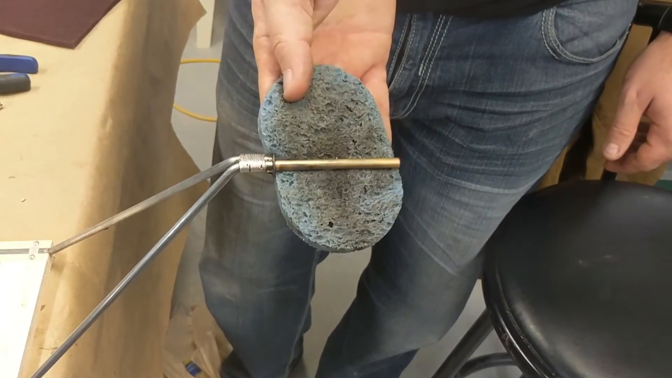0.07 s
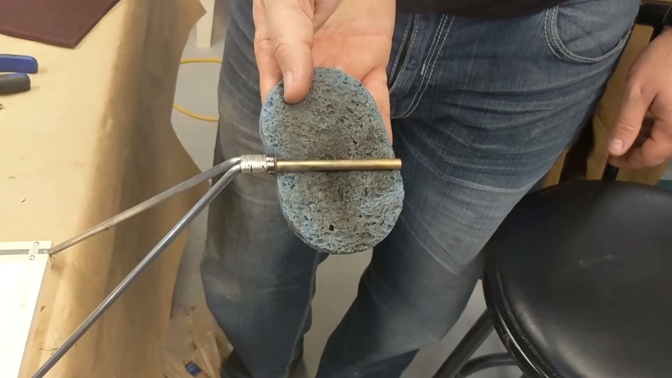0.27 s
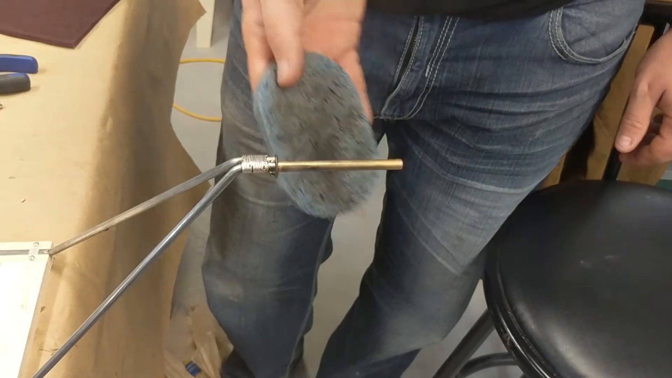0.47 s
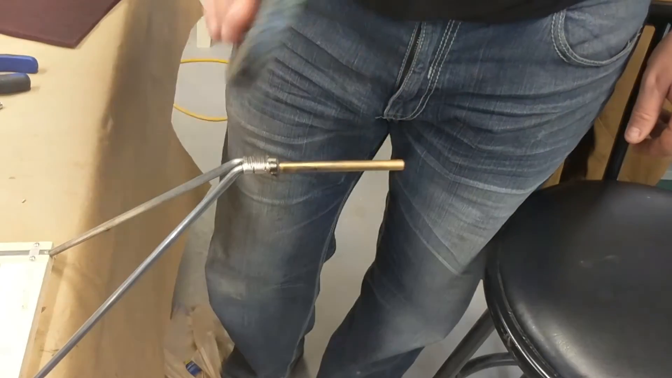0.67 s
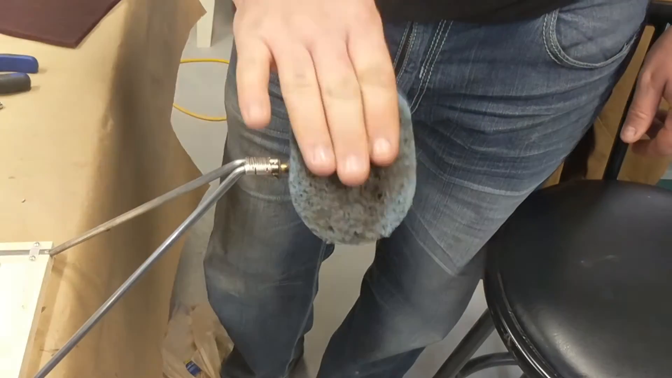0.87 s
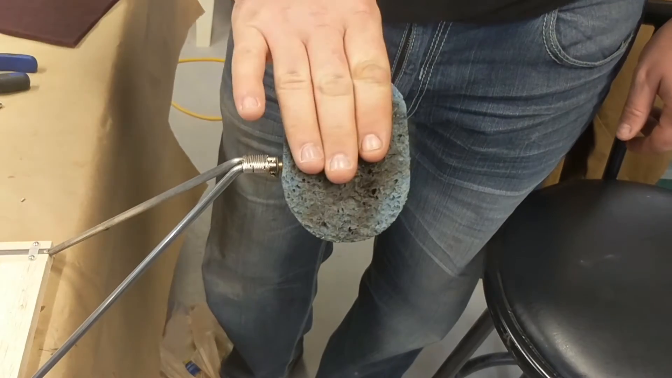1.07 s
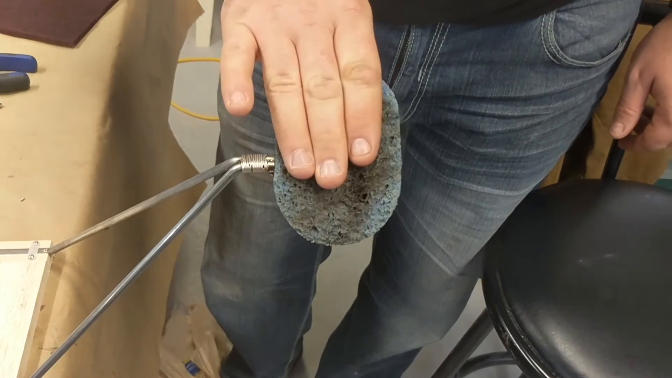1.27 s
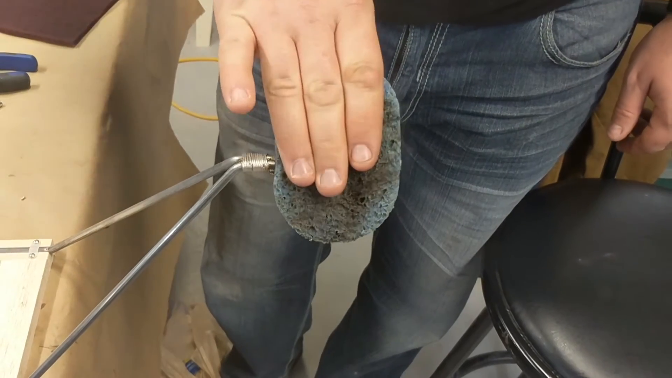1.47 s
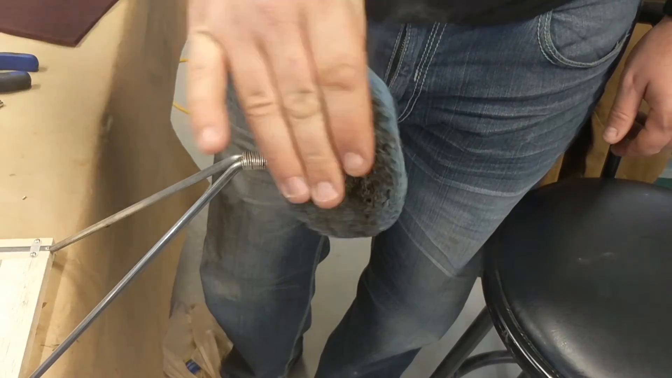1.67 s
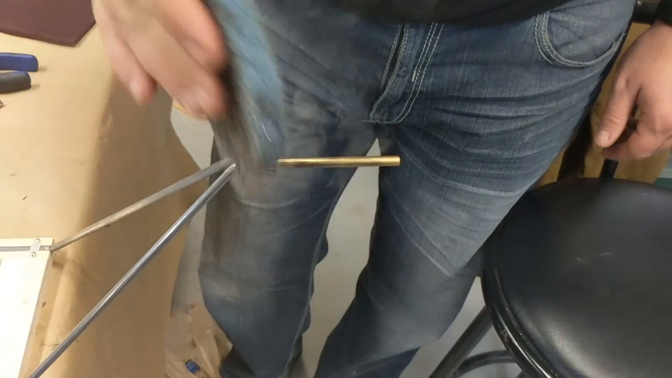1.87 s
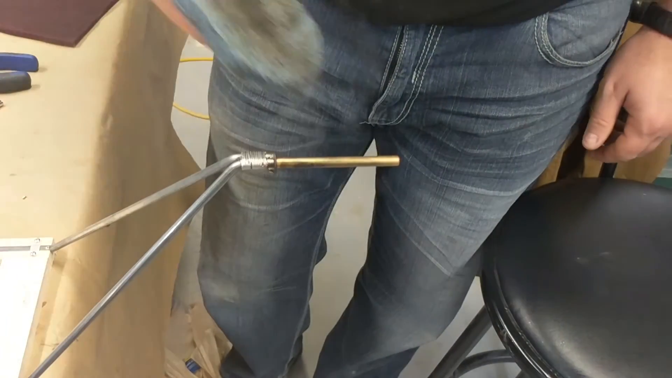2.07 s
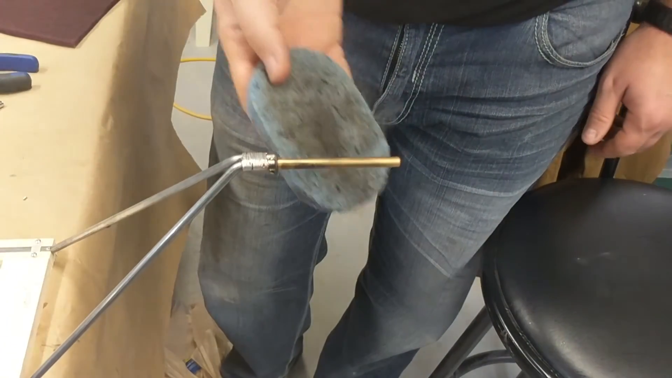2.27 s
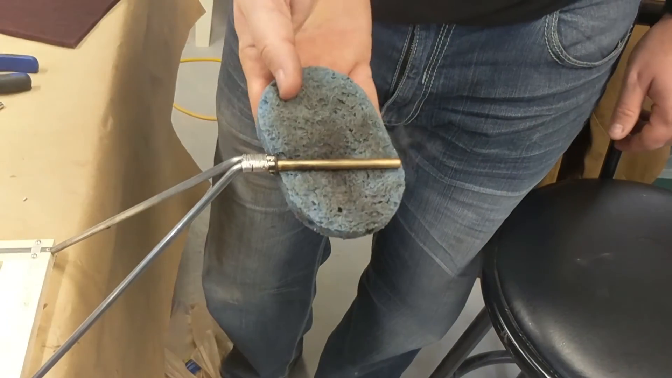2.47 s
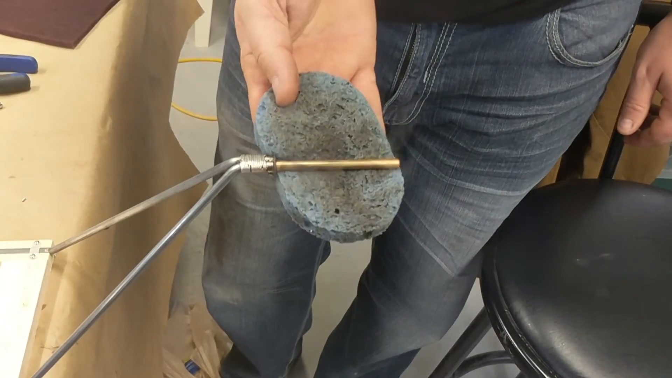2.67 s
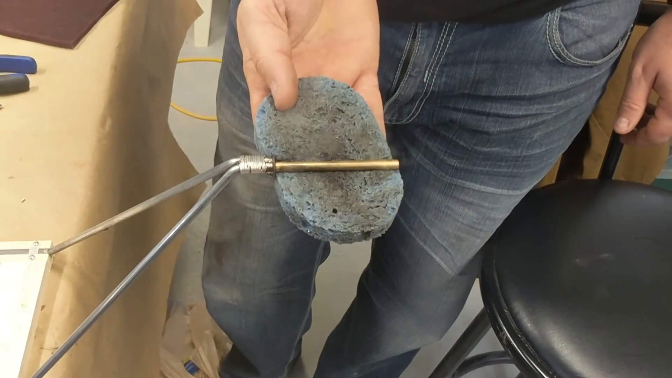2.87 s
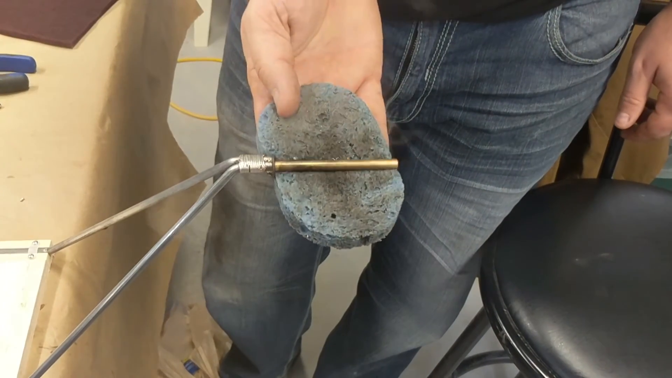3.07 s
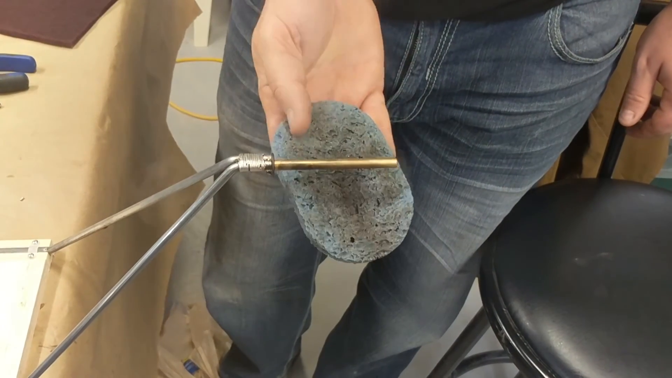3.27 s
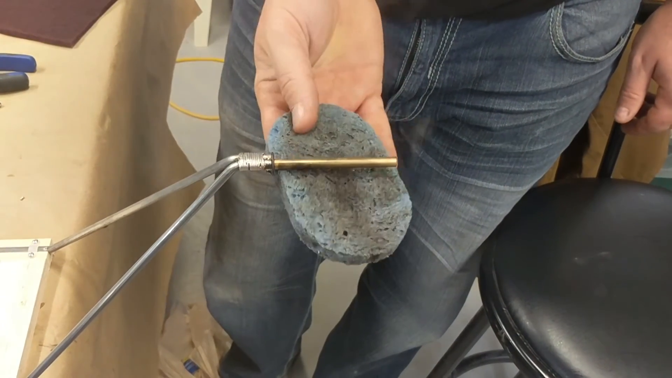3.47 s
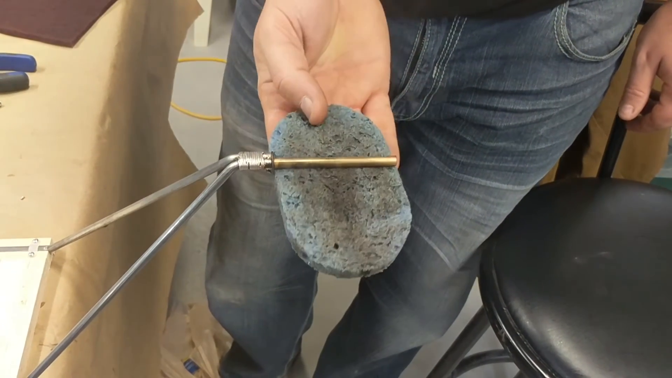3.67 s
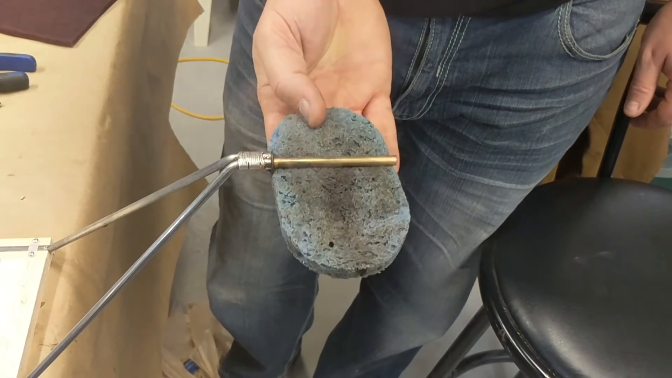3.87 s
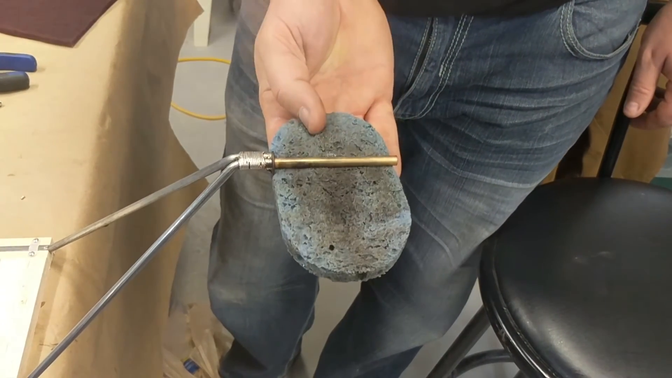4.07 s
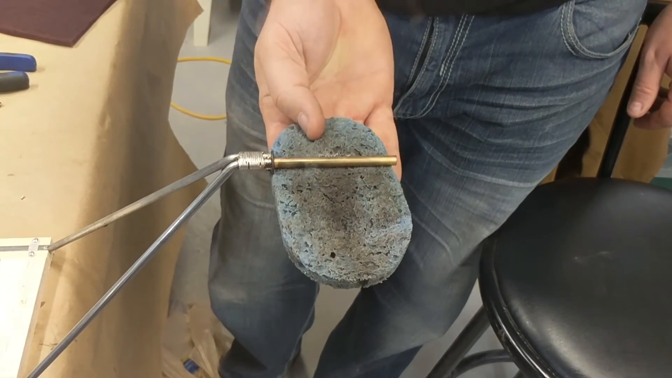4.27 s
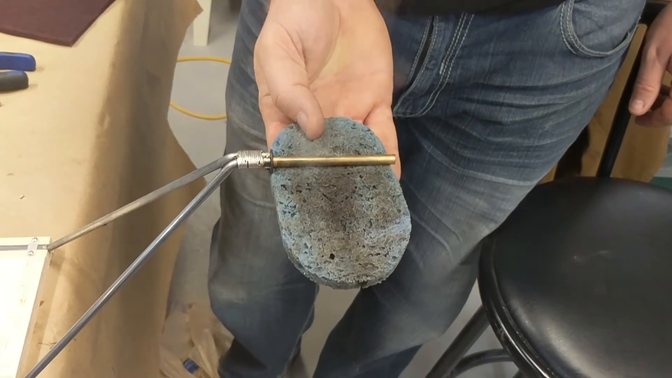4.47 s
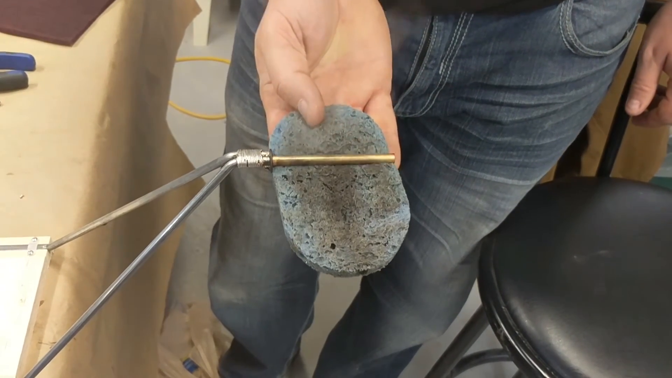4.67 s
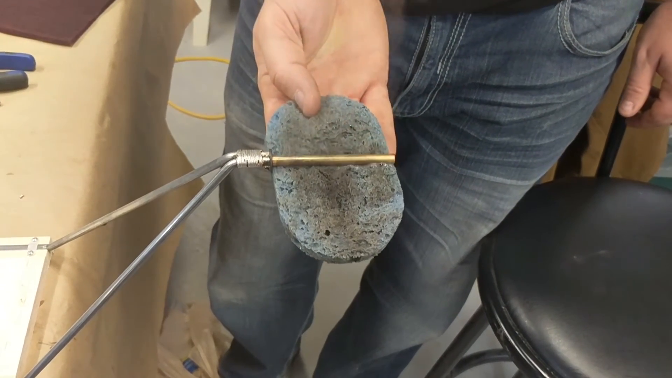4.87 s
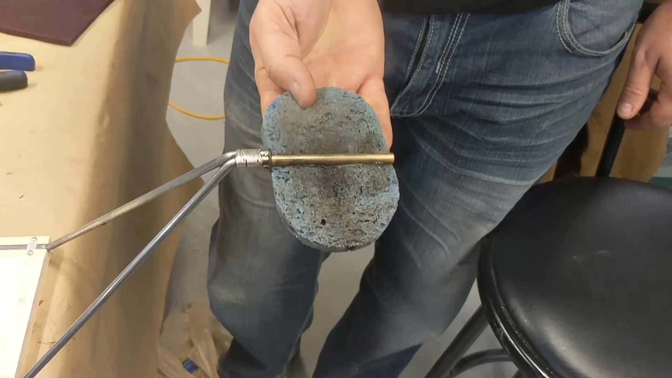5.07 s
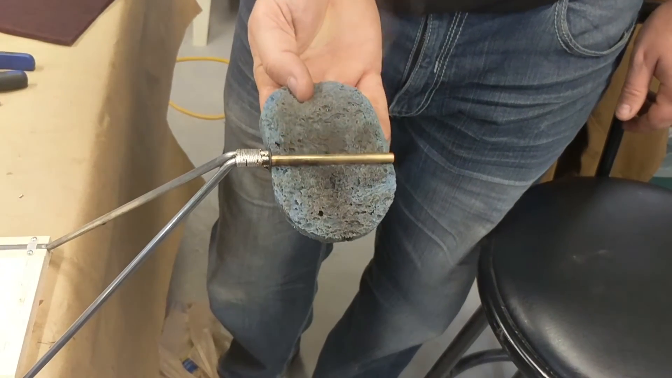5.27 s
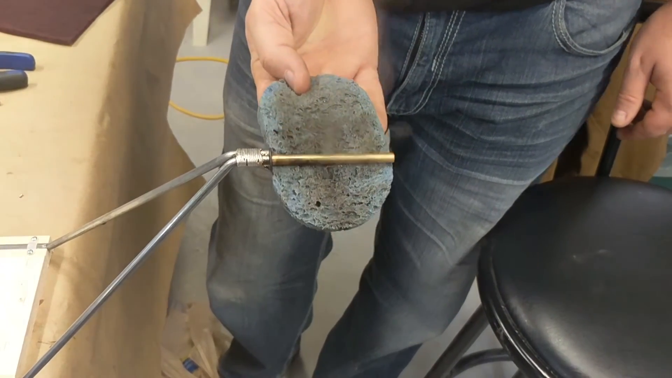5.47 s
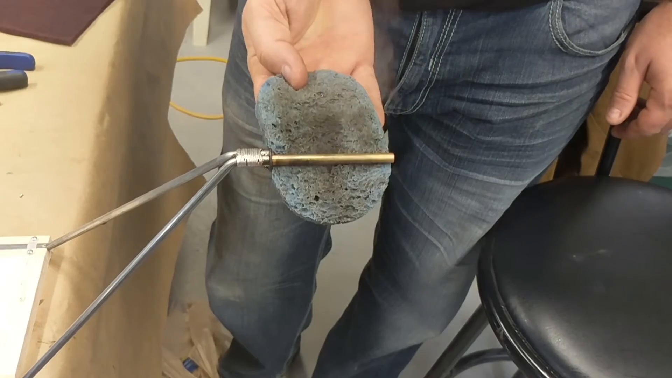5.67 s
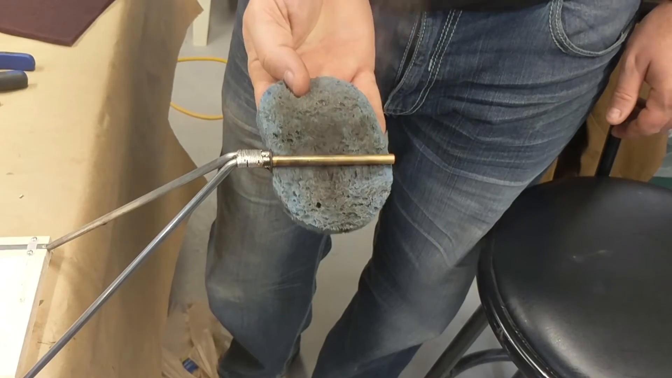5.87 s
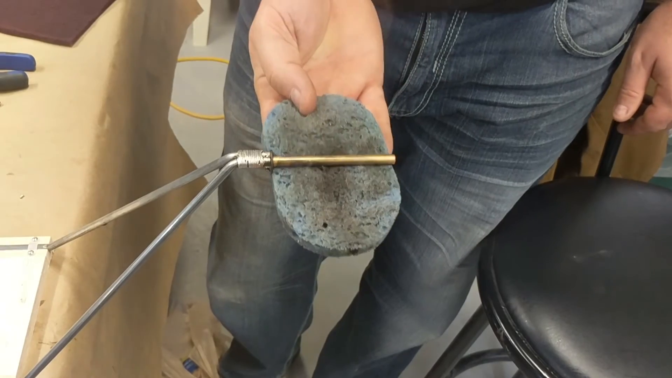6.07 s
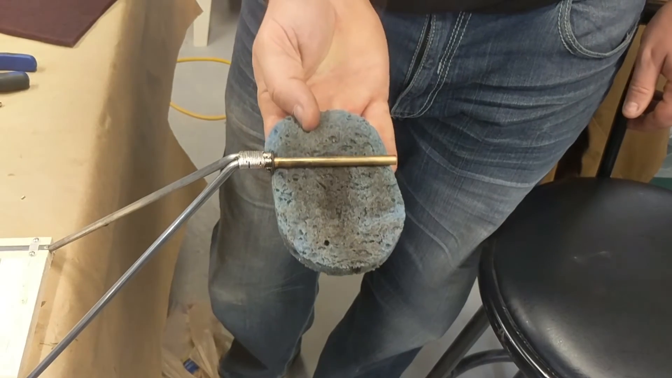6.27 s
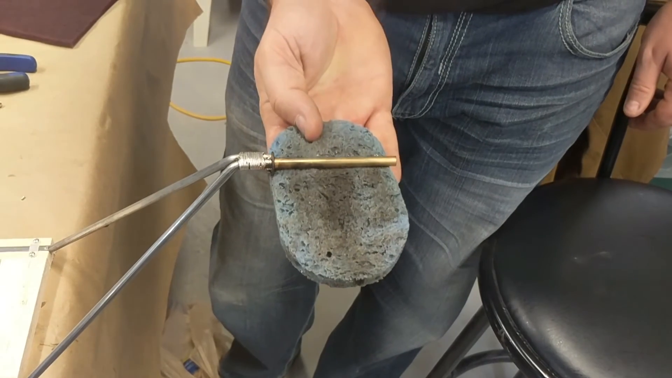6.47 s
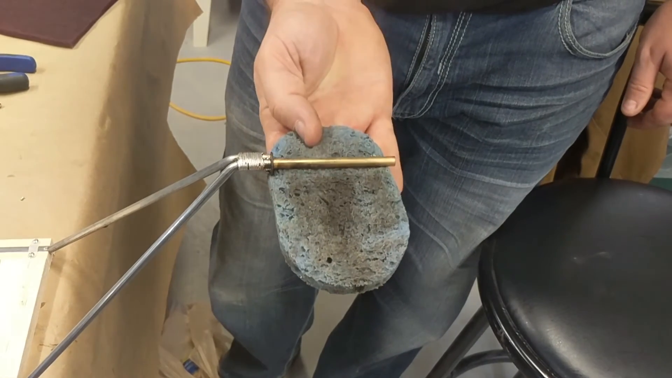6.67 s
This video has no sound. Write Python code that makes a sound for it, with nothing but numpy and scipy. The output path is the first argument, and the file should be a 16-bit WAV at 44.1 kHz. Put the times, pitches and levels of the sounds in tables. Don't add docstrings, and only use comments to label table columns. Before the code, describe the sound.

Bright, dense sizzling of water flashing to steam on hot brass, in several bursts, ending in one long steady hiss with sharp pops.

```python
import sys
import numpy as np
from scipy import signal
from scipy.fft import rfft, irfft
from scipy.io import wavfile
from scipy.ndimage import uniform_filter1d

SR = 44100
rng = np.random.default_rng(int(sys.argv[2]) if len(sys.argv) > 2 else 0)


def rack_gain(trim_db):
    fader = np.asarray(trim_db, float)
    return 10 ** (fader / 20)


def generate_wav(signal):
    frames = np.transpose(np.atleast_2d(signal))
    scaled = np.clip(frames, -1, 1) * 32767
    pcm = np.round(scaled).astype(np.int16)
    wavfile.write(sys.argv[1], SR, pcm)


N = 296969
EDGE_HZ = 15720


def unit_rms(x):
    return x / np.sqrt(np.mean(x ** 2) + 1e-20)


def read_spectrum(points, hz):
    point_hz, level_db = np.transpose(points)
    return np.interp(np.log(hz + 1), np.log(point_hz + 1), level_db)


def modal_lift(modes, hz):
    return sum(db / (1 + (2 * (hz - centre_hz) / width_hz) ** 2) for centre_hz, width_hz, db in modes)


def hump(hz, centre_hz, octaves):
    return np.exp(-.5 * (np.log2((hz + 1) / centre_hz) / octaves) ** 2)


def drift(per_s):
    hz = np.fft.rfftfreq(N, 1 / SR)
    return unit_rms(irfft(rfft(rng.standard_normal(N)) * hz * np.exp(-(hz / per_s) ** 2), N))


def passing_changes(t, events):
    return sum(db * np.exp(-((t - at) / length) ** 2) for at, length, db in events)


def add(mix, s, sound):
    part = mix[round(s * SR):][:len(sound)]
    part += sound[:len(part)]


# start_s, boiling_db, wetness_db
PRESS_TABLES = [
    [(0.0, -40.5, -10.5), (0.01, -43, -13.5), (0.226, -42, -14), (0.288, -46, -12), (0.326, -53, -7.5),
     (0.37, -92, 11)],
    [(0.9, -62, -6.5), (1.048, -48.5, -9.5), (1.226, -49.5, -8.5), (1.246, -43.5, -15), (1.5, -45, -10.5),
     (1.674, -51, -11), (1.69, -56, -8)],
    [(1.69, -56.5, -14), (1.79, -63.5, 0.5), (1.84, -60.5, -6), (1.864, -62, -5), (1.872, -60, -11),
     (1.906, -66.5, -1), (1.97, -70, -2)],
    [(2.39, -99, 2), (2.408, -50, -14), (2.434, -39, -18), (2.494, -39.5, -11.5), (3.144, -40.5, -13.5),
     (3.192, -44.5, -12), (3.23, -68, -8)],
    [(3.49, -81, -9), (3.51, -52, -19), (3.54, -46, -16.5), (3.64, -38, -14), (3.95, -39, -11.5),
     (5.82, -40, -8), (5.93, -44, -7), (6.03, -41, -8), (6.73, -40.5, -7)],
]
# start_s, length_s, boiling_db
EDGE_DABS = [
    (0.84, 0.011, -58),
    (0.878, 0.029, -49),
    (3.504, 0.0087, -49),
]
# centre_s, length_s, change_db
GRIP_SHIFTS = [
    (2.81, .06, -1.5),
    (3.89, 0.067, -2),
    (4.456, .1, -1.5),
    (4.64, .1, 0.9),
    (5.47, .08, -1),
    (6.055, .02, 1.5),
    (6.2, 0.027, 3),
    (6.24, .02, 0.5),
    (6.342, 0.061, 2),
    (6.47, .04, -1),
]


def boiling(t):
    boil_db = np.full(N, -110.)
    for rows in PRESS_TABLES:
        s, db, _ = np.transpose(rows)
        dying_s = s[-1] + .1
        boil_db = np.maximum(boil_db, np.interp(t, [*s, dying_s], [*db, -110], left=-110))
    for s, length, db in EDGE_DABS:
        edge = np.maximum((s - t) / .25, t - s) / length
        boil_db = np.maximum(boil_db, db - 4.5 * edge)
    s, _, wet_db = np.transpose(sum(map(list, PRESS_TABLES), []))
    shift_db = passing_changes(t, GRIP_SHIFTS)
    surge_db = .5 * drift(15.7)
    usual_wet_db = -10.5
    wetness_db = np.interp(t, s, wet_db) - usual_wet_db - 0.43 * shift_db
    return boil_db + shift_db + surge_db, wetness_db


def patchwork(shape, across_pitch):
    chance = rng.standard_normal(shape[::-1]).T
    across = uniform_filter1d(chance, size=across_pitch, axis=0)
    return unit_rms(uniform_filter1d(across, size=30, axis=1))


# frequency_hz, density_db_per_hz
FIZZ_SPECTRUM = [(240, -64), (400, -15.5), (488, -13), (727, -14), (1020, -7), (1300, -10.5), (2370, -4.5),
                 (3870, -8.5), (11700, -2.5), (14200, 1), (15600, 0.5)]
# frequency_hz, width_hz, lift_db
BENCH_MODES = [(1010, 47, -4.5), (1290, 30, -1), (1480, 68, 1), (1700, 69, 1), (2620, 80, 0.5),
               (3290, 32, 1), (3860, 53, 9.5)]
# time_s, depth_db
PORE_RINGING = [
    (.85, .5),
    (.95, 1.5),
    (1.6, 1.2),
    (1.72, 2.2),
    (1.98, 2.2),
    (2.3, .6),
]


def steam():
    t = np.arange(N) / SR
    boil_db, wet_db = boiling(t)
    spread_db = 3 + 0.045 * np.maximum(-41 - boil_db, 0)
    sizes = rack_gain(np.clip(spread_db, 0, 6) * np.minimum(rng.exponential(1, N), 5))
    bubbles_per_s = 9000
    bursts = sizes * rng.choice([-1., 1.], N) * (rng.random(N) < bubbles_per_s / SR)
    bursts = bursts / np.sqrt(uniform_filter1d(bursts ** 2, size=4410) + 1e-9)
    drive = rack_gain(-4.0) * bursts + rack_gain(-3.0) * rng.standard_normal(N)
    hz, frames, z = signal.stft(drive, SR, nperseg=512, noverlap=384)

    wet = np.interp(frames, t, wet_db)
    sputter = hump(hz, 2400, .55)[:, None] * wet
    body = hump(hz, 5500, .55)[:, None] * (2.13 + 0.47 * wet)
    gurgle = np.maximum(hump(hz, 1000, .4), hz < 1000)[:, None] * (-1 + 1.1 * wet)
    wetness = np.clip(sputter + body + gurgle, -25, 25)

    shape = (len(hz), len(frames))
    patches = patchwork(shape, 8)
    pores = patchwork(shape, 3) * np.interp(frames, *np.transpose(PORE_RINGING))
    flutter = unit_rms(uniform_filter1d(rng.standard_normal(len(frames)), size=3))
    plain = read_spectrum(FIZZ_SPECTRUM, hz) + modal_lift(BENCH_MODES, hz) - 60 * (hz > EDGE_HZ)
    colour = rack_gain(plain[:, None] + wetness + pores + 0.73 * patches + 0.42 * flutter)
    fizz = signal.istft(z * colour, SR, nperseg=512, noverlap=384)[1][:N]
    return rack_gain(boil_db + 6.5) * fizz


# frequency_hz, density_db_per_hz
AIR_SPECTRUM = [(15, -30), (25, -17), (66, -2.5), (129, 0), (314, -13), (400, -19.5), (633, -17),
                (724, -24.5), (923, -20), (1420, -43), (1670, -27), (3020, -30), (6950, -36), (9350, -37.5),
                (15600, -39.5)]
# frequency_hz, width_hz, lift_db
ROOM_MODES = [(58, 14, 8), (68, 12, 7), (90, 12, 5), (116, 10, 6), (135, 8, 5), (148, 9, 12), (160, 8, 5),
              (186, 10, 4), (210, 18, 5), (241, 12, 6), (305, 16, 8), (331, 8, 6), (499, 20, 4),
              (1220, 40, 3), (2100, 40, 3)]


def ventilation(fizz):
    back_s = 0.43
    keep = np.exp(-1 / (back_s * SR))
    loud = signal.lfilter([1 - keep], [1, -keep], abs(fizz))
    duck = rack_gain(-4.5 * loud / loud.max())
    hz = np.fft.rfftfreq(N, 1 / SR)
    colour = rack_gain(read_spectrum(AIR_SPECTRUM, hz) + modal_lift(ROOM_MODES, hz))
    air = rfft(rng.standard_normal(N)) * colour * (hz < EDGE_HZ + 150)
    thin = irfft(air * (hz > 400), N)
    whole = irfft(air, N)
    return rack_gain(-48.5) * (whole + (duck - 1) * thin) / whole.std()


def add_snap(mix, s, peak_db, hz):
    cycles = np.arange(64) / SR * hz * 1.15
    turn = rng.uniform(-0.12, 1.0)
    snap = np.sin(2 * np.pi * cycles + turn) * cycles * np.exp(-2.4 * cycles)
    snap = snap - snap.mean()
    snap = snap + .25 * np.roll(snap, shift=17)
    add(mix, s - .0001, rack_gain(peak_db) * snap / abs(snap).max())


# start_s, peak_db
LARGE_BUBBLES = [(.0054, -28), (.2586, -27), (.2834, -26), (.3168, -30), (2.4159, -30), (2.4362, -25),
                 (2.4465, -24), (2.5398, -22), (2.5862, -18), (2.594, -22), (2.636, -21), (2.6708, -19),
                 (2.731, -20), (2.8454, -21), (2.8712, -22), (2.896, -20), (2.9182, -22), (2.9843, -22),
                 (3.073, -23), (3.1223, -23), (3.1557, -23), (3.6768, -21), (3.7357, -20), (4.5475, -22),
                 (5.6347, -19), (5.741, -17), (5.751, -21), (6.4387, -18), (6.6702, -21)]


def bubble_pops(mix):
    for s, peak_db in LARGE_BUBBLES:
        add_snap(mix, s, peak_db, rng.uniform(10000, 12000))


# start_s,
# peak_db, pitch_hz
PITCHED_SNAPS = [(.3361, -33, 8150), (0.7088, -47, 1490), (.8365, -45, 9000), (0.875, -32, 8000),
                 (.878, -34, 7100), (0.8791, -31.5, 4760), (0.8854, -32, 7600), (1.679, -40, 3200),
                 (2.2868, -46, 7400), (2.4099, -35, 9000), (3.4386, -46, 3060), (3.435, -53, 2500),
                 (3.441, -55, 1500), (2.0005, -44, 6000)]


def pitched_snaps(mix):
    for s, peak_db, pitch_hz in PITCHED_SNAPS:
        add_snap(mix, s, peak_db, pitch_hz)


# start_s, film_db, rustle_db
OFF_ROD = [
    (.35, -71.5, -67.5),
    (2.0, -79, -69),
    (3.22, -75, -72),
]
# centre_s, length_s, rustle_db
HAND_SWINGS = [
    (0.564, .04, 3),
    (.71, 0.036, 2),
    (2.144, 0.04, 2.5),
    (2.31, 0.036, 0),
    (3.47, .05, 1),
]


def between_presses():
    s, film_db, rustle_db = np.transpose(OFF_ROD)
    t, hz = np.arange(N) / SR, np.fft.rfftfreq(N, 1 / SR)
    sizes = rack_gain(5.2 * np.minimum(rng.exponential(1, N), 4))
    ticks = sizes * np.clip(rng.standard_normal(N), -2, 2) * (rng.random(N) < .12)
    film = unit_rms(irfft(rfft(ticks) * hump(hz, 13000, 0.97) * (hz < EDGE_HZ + 150), N))
    rustle = unit_rms(irfft(rfft(rng.standard_normal(N)) * hump(hz, 1090, 0.68), N))
    gap = np.searchsorted(s[1:] - .2, t)
    since = np.clip(t - s[gap], 0, .5)
    film_level_db = film_db[gap] - 18 * since + .7 * drift(9)
    rustle_level_db = rustle_db[gap] + 9.5 * since + 1.2 * drift(9) + passing_changes(t, HAND_SWINGS)
    return film * rack_gain(film_level_db) + rustle * rack_gain(rustle_level_db)


# start_s, peak_db
LAST_DROPS = [(.4438, -51), (.4908, -52), (.522, -46), (.7615, -53), (.7732, -50), (1.9, -44),
              (1.9271, -48), (1.9733, -51), (2.0002, -41), (2.005, -52), (2.015, -50), (2.076, -54),
              (2.1, -51), (2.1753, -43), (2.1762, -48), (2.215, -51), (2.3346, -52), (3.2499, -47),
              (3.2588, -53), (3.293, -50), (3.3526, -49), (3.363, -50), (3.3779, -49), (3.4146, -53),
              (3.444, -43.5), (3.4783, -46.5), (3.497, -54)]


def spitting_drops(mix):
    for s, peak_db in LAST_DROPS:
        add_snap(mix, s, peak_db, rng.uniform(10500, 13000))


def resonate(x, hz, width_hz):
    turn = np.exp(2j * np.pi * np.cumsum(hz) / SR)
    r = np.exp(-np.pi * width_hz / SR)
    return 2 * (turn * signal.lfilter([1 - r], [1, -r], x / turn)).real


# start_s, length_s, pitch_hz, glide_hz, level_db
PORE_JETS = [
    (.87, 0.35, 5060, 60, -63),
    (0.88, .34, 5340, 330, -62.5),
    (.98, 0.24, 8350, 250, -59),
    (.98, 0.67, 2070, 38, -62),
    (1.2, .13, 1645, 5, -62),
    (1.12, 0.59, 1210, 15, -66),
    (1.04, .18, 3150, 50, -67),
    (1.1, 0.25, 8400, -50, -62),
    (1.74, .2, 5100, 10, -82),
]


def steam_jets(mix):
    for start, length, hz, glide, db in PORE_JETS:
        t = np.arange(0, length, 1 / SR)
        pitch = (hz + glide * t / length) * (1 + .014 * drift(17)[:len(t)])
        width_hz = min(450, .15 * hz)
        whistle = resonate(rng.standard_normal(len(t)), pitch, width_hz)
        whistle = resonate(whistle, pitch, width_hz)
        opening = np.clip(np.minimum(t / .04, (length - t) / .06), 0, 1)
        level_db = db - 12 * (1 - opening) + drift(23)[:len(t)] + 2
        add(mix, start, rack_gain(level_db) * unit_rms(whistle))


def scene():
    fizz = steam()
    mix = fizz + ventilation(fizz) + between_presses()
    bubble_pops(mix)
    pitched_snaps(mix)
    spitting_drops(mix)
    steam_jets(mix)
    return np.array([mix, mix])


# time_s, low_hz, high_hz, level_db
CHANNEL_SPLITS = [(.07, 5600, 7800, -59), (1.81, 5100, 7000, -71), (2.25, 4600, 5800, -86),
                  (3.9, 4100, 6400, -55), (3.9, 10300, 12600, -52), (3.9, 13000, 15500, -50),
                  (3.97, 7500, 9100, -55), (3.97, 12300, 14000, -52), (4.06, 8200, 9900, -54),
                  (4.94, 6800, 8400, -56), (6.22, 8200, 10500, -52), (6.22, 12300, 14700, -50),
                  (6.31, 4600, 5800, -58), (6.52, 5000, 6400, -58), (6.52, 14400, 15800, -55),
                  (6.61, 12300, 14000, -52)]


def channel_difference():
    side = np.zeros(N)
    hz = (np.arange(1024) + .5) * SR / 2048
    window = signal.windows.cosine(2048)
    for s, low_hz, high_hz, db in CHANNEL_SPLITS:
        start = round((s * SR - 143) / 1024 - 1) * 1024 + 143
        lines = np.flatnonzero((hz > low_hz) & (hz < high_hz))
        waves = window * np.cos(np.pi / 1024 * np.outer(lines + .5, np.arange(2048) + 512.5))
        noise = rng.standard_normal(1024)[lines] @ waves
        add(side, start / SR, rack_gain(db) * unit_rms(noise))
    return np.array([side, -side])


def band_limit(x):
    return signal.sosfilt(signal.butter(12, 15800, fs=SR, output="sos"), x)


def record(dry):
    mix = dry + channel_difference()
    return band_limit(mix)


dry = scene()
out = record(dry)
generate_wav(out)
```